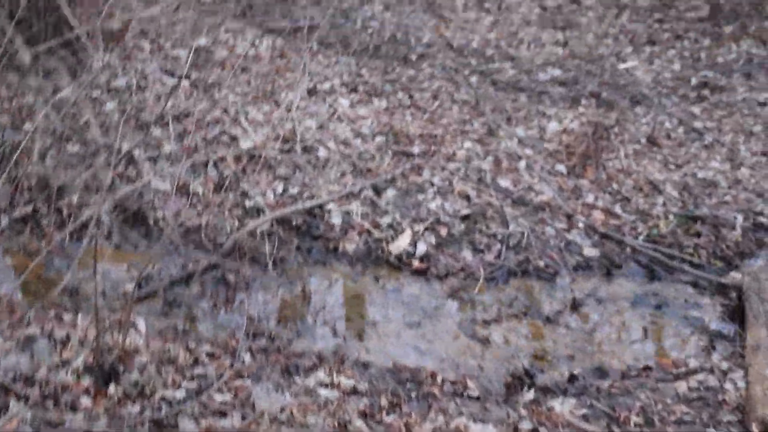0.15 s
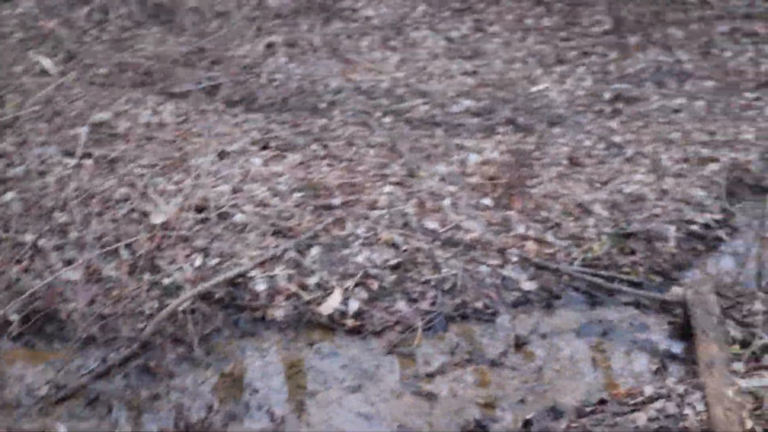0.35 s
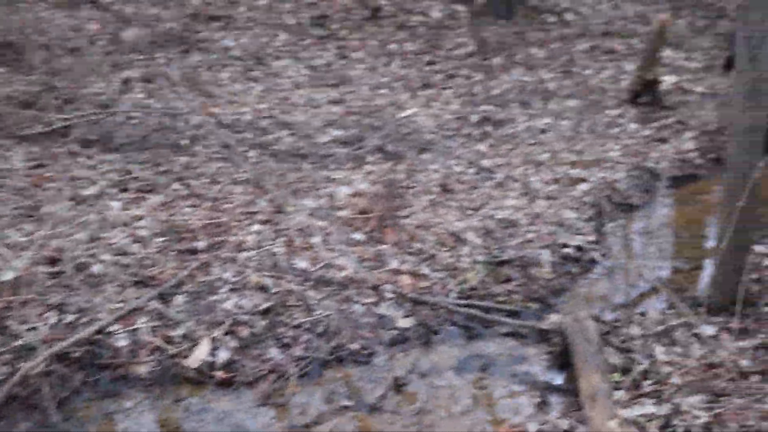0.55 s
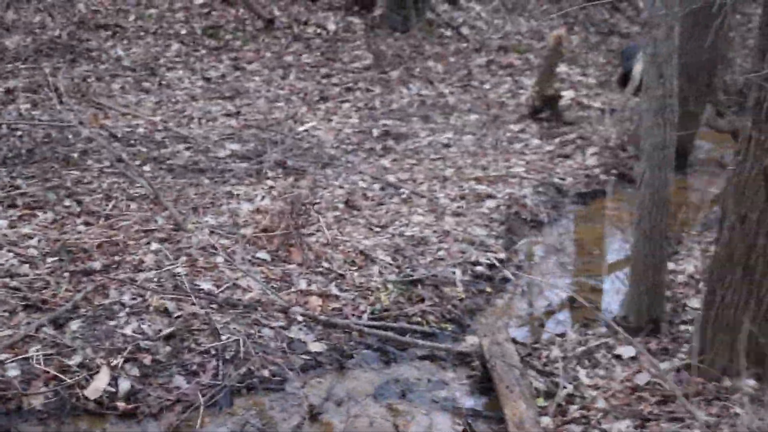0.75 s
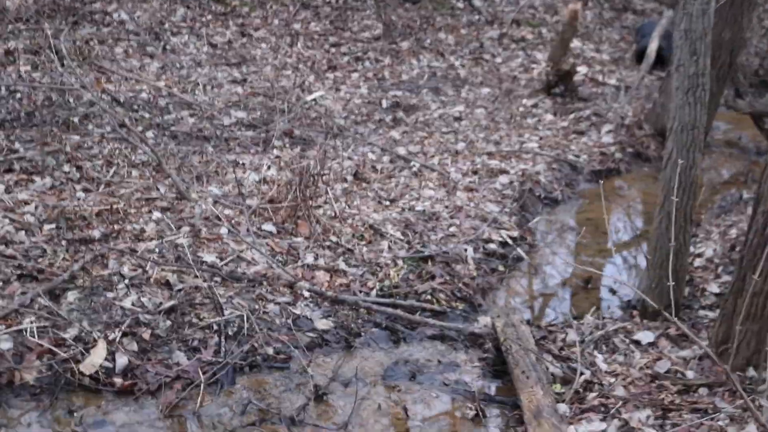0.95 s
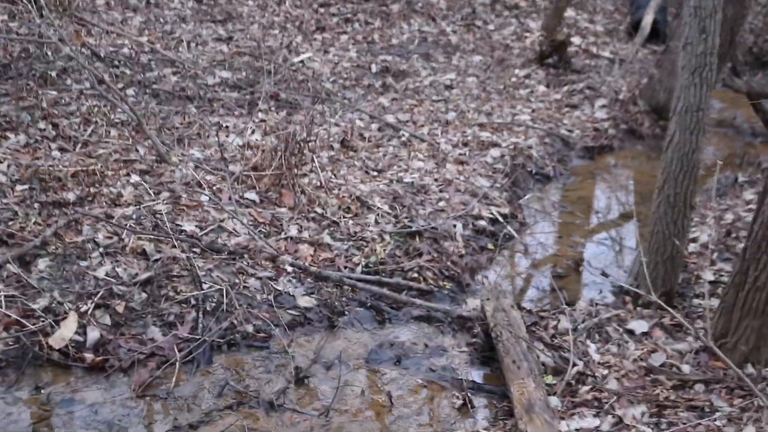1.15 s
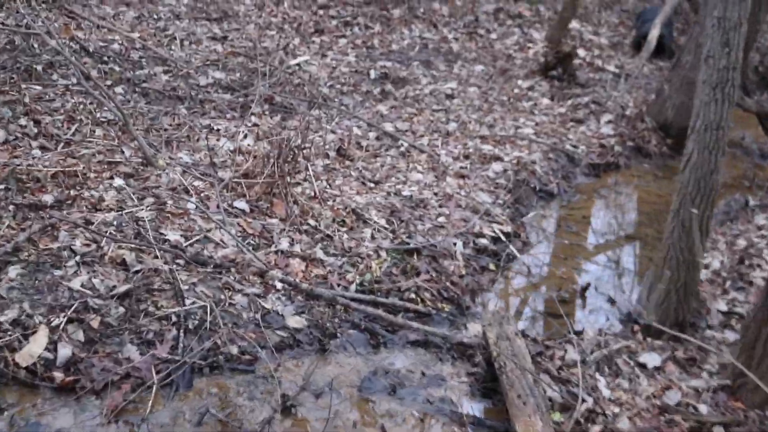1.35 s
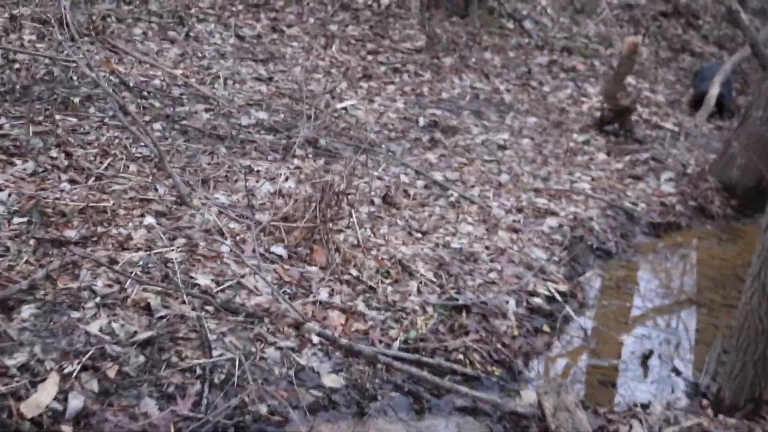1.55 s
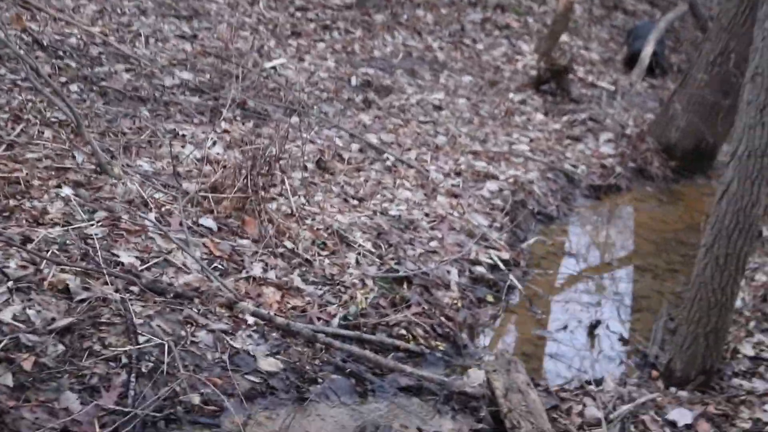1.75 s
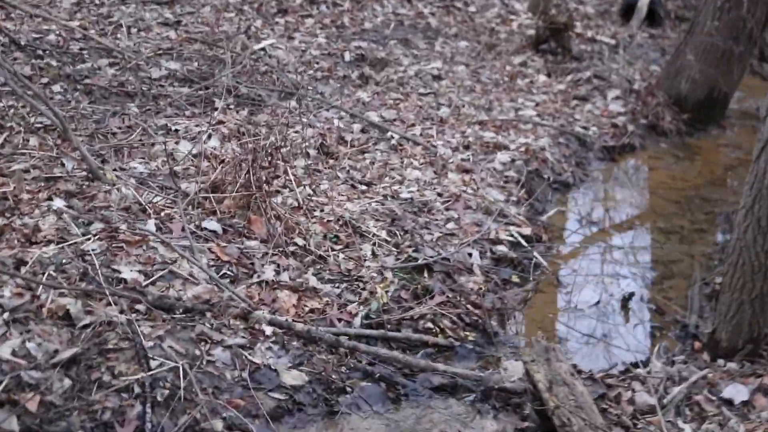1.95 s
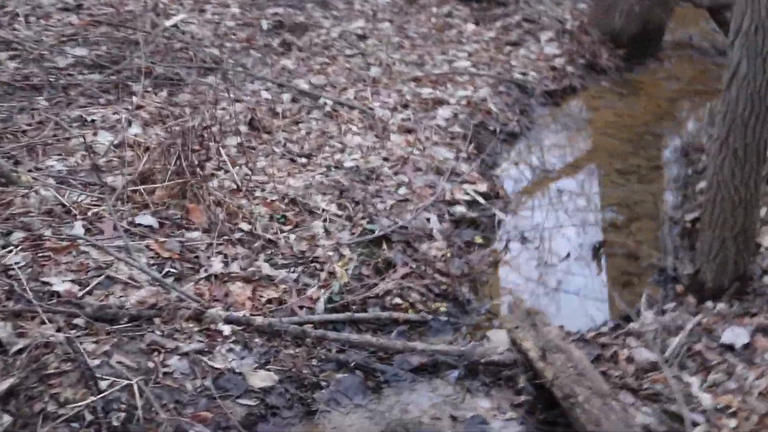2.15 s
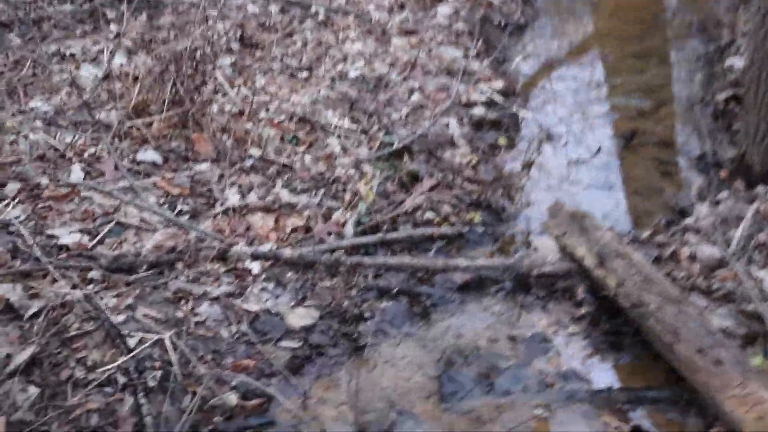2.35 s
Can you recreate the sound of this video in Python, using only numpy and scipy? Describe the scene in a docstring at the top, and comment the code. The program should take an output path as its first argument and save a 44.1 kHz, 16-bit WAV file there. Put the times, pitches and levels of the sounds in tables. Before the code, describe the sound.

Footsteps in dry leaves, close and mono, outdoors. A softer crunch swells at 0.15-0.4 s; a sharp, heavy step lands at 0.7 with a dull knock, then scattered snaps until 1.25. A bright crunch hits at 1.41 and thins out. From 2.0 a hollow dragging rub leads into uneven crunching, with brittle cracks near 2.13 and another surge at 2.25. Deep handling rumble and faint air noise underneath.

```python
"""In a wood, a walker crunches through dry leaves, carrying a small camera with one microphone.
Each step crushes and drags leaves: swarms of tiny noise bursts in three bands that follow the steps.
Twigs and leaves snap (damped rings), crack (a burst rings a bright shell) and rustle (fading high noise).
Knocks and a dragging rub sound the modes of the hollow camera body; its sway is a deep noise rumble.
Faint steady air noise lies under it all."""
import sys
import numpy as np
from scipy import signal
from scipy.io import wavfile
from scipy.ndimage import uniform_filter1d

SR = 44100
rng = np.random.default_rng(int(sys.argv[2]) if len(sys.argv) > 2 else 0)


def unload_wav(signal):
    """Save mono or channel-first audio to the path in sys.argv[1] as 16-bit WAV at rate SR, clipped to [-1, 1]."""
    wavfile.write(
        sys.argv[1],
        SR,
        np.round(np.clip(np.atleast_2d(signal).T, -1, 1) * 32767).astype(np.int16),
    )


N = 105795
T = np.arange(N) / SR

# modes of the hollow camera body, low to high: f/Hz, 60 dB decay time/s
BODY_MODES = [(114, .08), (160, .06), (228, .1), (300, .14), (580, .06), (727, .08), (1070, .03)]
# balance inside the three lowest modes and inside the three upper ones: level/dB
LOW_MODE_BALANCE = [3, -2.5, 2]
UPPER_MODE_BALANCE = [-6.5, 3.5, -7]


def gain_of(db):
    """Amplitude factor of a level in dB."""
    return 10 ** (np.asarray(db) / 20)


def evened(x):
    """Scales a sound to an rms of 1."""
    return x / np.sqrt(np.mean(x ** 2) + 1e-20)


def level(curve, column):
    """Gain over time from one dB column of a curve."""
    rows = np.array(curve)
    return gain_of(np.interp(T, rows[:, 0], rows[:, column]))


def add(mix, s, sound):
    """Mixes in a sound at s seconds, cut off at the end of the mix."""
    part = mix[round(s * SR):][:len(sound)]
    part += sound[:len(part)]


def coloured(x, points, skirt_db=-17.5):
    """Minimum-phase filter through (Hz, dB) points, falling by skirt_db per octave outside; rms 1."""
    f, db = np.transpose(points)
    octave = np.log2(np.abs(np.fft.fftfreq(8192, 1 / SR)) + 1)
    below = np.maximum(np.log2(f[0]) - octave, 0)
    above = np.maximum(octave - np.log2(f[-1]), 0)
    gain_db = np.interp(octave, np.log2(f), db) + skirt_db * (below + above)
    log_gain = np.log(gain_of(np.maximum(gain_db, -100)))
    # the Hilbert transform of the log gain supplies the phase that makes the filter causal
    taps = np.fft.ifft(np.exp(np.conj(signal.hilbert(log_gain)))).real[:4096]
    return evened(signal.oaconvolve(x, taps)[:N])


def clicks(per_s, spread_db):
    """Random clicks of either sign; a few are large."""
    chance = rng.random(N)
    size = rng.exponential(1, N)
    sign = rng.choice([-1., 1.], N)
    return sign * gain_of(spread_db * np.minimum(size, 5)) * (chance < per_s / SR)


def push(t, width_s):
    """A single soft pressure swing without a ring, peaking near 1."""
    u = t / width_s
    return u * (1 - u / 2) * np.exp(1 - u) / .63


def mode(hz, db, t60):
    """One resonance: a sine that decays by 60 dB in t60 seconds."""
    t = np.arange(6000) / SR
    return gain_of(db - 60 * t / t60) * np.sin(2 * np.pi * hz * t)


def air():
    """Faint steady air noise: coloured random pressure."""
    # colour of the air noise: f/Hz, relative density/dB per Hz
    air_spectrum = [(300, -28), (593, 18.5), (1170, 12), (3350, -22.5), (4990, -39), (13800, 12),
                    (16000, -6)]
    return gain_of(-64) * coloured(rng.standard_normal(N), air_spectrum)


def sway():
    """Deep wavering rumble of the carried camera: narrow noise, with a lumpy low noise above it."""
    # swells of the sway: t/s, deep rumble level/dB, level of the rumble above it/dB
    swells = [(0, -18, -43), (.19, -45, -48.5), (.39, -26.5, -44), (.45, -31, -49.5), (.71, -42.5, -43),
              (.8, -27, -30.5), (.94, -34., -46), (1.08, -39, -30.5), (1.11, -20.5, -42),
              (1.33, -45, -39.5), (1.59, -29.5, -36), (1.66, -38, -39), (1.78, -27, -39.5),
              (2.0, -46, -39.5), (2.17, -25.5, -34), (2.22, -33, -34), (2.28, -25, -30), (2.4, -29.5, -35)]
    # colour of the rumble above: f/Hz, relative density/dB per Hz
    rumble_spectrum = [(35, -2), (70, 1), (150, -0.5), (300, -13.5), (600, -30.5)]
    centre_hz, width_hz = 24.4, 3.6
    band = [(centre_hz - width_hz / 2, 0.), (centre_hz + width_hz / 2, 0.)]
    deep = coloured(rng.standard_normal(N), band, skirt_db=-21.5)
    above = coloured(rng.standard_normal(N), rumble_spectrum)
    return level(swells, 1) * deep + level(swells, 2) * above


def tilted(x):
    """Leans the spectrum frame by frame, as leaves of different size give way."""
    # lean of the crunch: t/s, tilt/dB per octave
    tilt_curve = [(0, -0.5), (.71, -5), (.72, -2.5), (1.4, -5.5), (1.41, 4), (1.45, -1.5), (1.98, -1),
                  (2.02, -12.5), (2.08, -12), (2.1, -0.5), (2.2, -2.5)]
    pivot_hz = 3100
    hz, t, z = signal.stft(x, SR, nperseg=256, noverlap=192)
    # the lean stops growing one octave from the pivot
    octaves = np.clip(np.log2(hz / pivot_hz + 1e-3), -1, 1)[:, None]
    gain = gain_of(octaves * np.interp(t, *np.transpose(tilt_curve)))
    return signal.istft(z * gain, SR, nperseg=256, noverlap=192)[1][:N]


def leaves():
    """Countless small leaf breaks, each a tiny decaying noise burst with its own tint."""
    # four steps, each a curve: t/s, crunch level/dB, treble level/dB, low-mid level/dB
    step_curves = [
        [(0, -49, -57.5, -48), (.058, -54, -58, -57), (.07, -36.5, -52, -43), (.11, -44, -50.5, -56.5),
         (.16, -29.5, -41, -36), (.3, -26, -37.5, -33), (.37, -34.5, -45.5, -38.5), (.445, -40.5, -50, -46),
         (.475, -35, -49, -39), (.55, -45.5, -54, -51.5), (.62, -47.5, -54, -49.5)],
        [(.68, -38.5, -50.5, -42), (.703, -19.5, -37, -23.5), (.722, -19, -35, -21.5), (.735, -23, -31, -27),
         (.765, -26, -32.5, -32), (.79, -35, -39.5, -40), (.84, -29, -40, -34.5), (.89, -37.5, -45.5, -42),
         (1.01, -37, -41.5, -39.5), (1.06, -34.5, -43, -34), (1.1, -44.5, -52.5, -47.5),
         (1.24, -41.5, -49, -46), (1.27, -46.5, -53.5, -49.5)],
        [(1.402, -45.5, -53.5, -48), (1.412, -23, -38, -31), (1.428, -17, -30, -25.5),
         (1.455, -24.5, -35, -31.5), (1.5, -21, -33.5, -28.5), (1.525, -30.5, -41, -36.5),
         (1.6, -36, -46.5, -44), (1.77, -43.5, -52, -47.5), (1.897, -36, -48, -43.5), (1.915, -47.5, -50, -49)],
        [(2.005, -43, -48.5, -44.5), (2.015, -33.5, -48.5, -25.5), (2.07, -30, -45, -55),
         (2.1, -29.5, -40.5, -38), (2.135, -19, -33, -28), (2.175, -27.5, -40.5, -31),
         (2.215, -24.5, -39, -32.5), (2.255, -19.5, -32, -27), (2.275, -30.5, -40, -34.5),
         (2.4, -40.5, -44.5, -44)],
    ]
    # colours of crunch, treble fizz and low-mid scuff: f/Hz, relative density/dB per Hz
    crunch_spectrum = [(1700, -5), (2500, 1), (3300, 3.5), (4000, -1.5), (5200, -18), (7000, -27)]
    fizz_spectrum = [(2940, -34), (5000, -3), (7640, -3), (8880, -6.5), (14000, -13), (16000, -16)]
    scuff_spectrum = [(200, -0.5), (450, 3.5), (800, 4.5), (1400, 6.5), (2200, -6.5)]
    kinds, grain_decay_s, tint_db = 24, 0.00054, 2.5
    smooth_share = 0.21  # power share of the treble that is smooth rustle

    train = clicks(per_s=5200, spread_db=2.5)
    kind = rng.integers(0, kinds, N)
    t = np.arange(200) / SR
    bursts = rng.standard_normal((kinds, 200)) * np.exp(-t / grain_decay_s)
    tint = gain_of(tint_db * rng.standard_normal((kinds, 3)))

    def grains(band):
        """The swarm of breaks, tinted for one band."""
        out = np.zeros(N)
        for k in range(kinds):
            out += tint[k, band] * signal.oaconvolve(train * (kind == k), evened(bursts[k]))[:N]
        return out

    crunch = tilted(coloured(grains(0), crunch_spectrum))
    rustle = rng.standard_normal(N)
    treble = np.sqrt(1 - smooth_share) * evened(grains(1)) + np.sqrt(smooth_share) * rustle
    fizz = coloured(treble, fizz_spectrum)
    scuff = coloured(grains(2), scuff_spectrum)
    steps = np.concatenate(step_curves)
    return level(steps, 1) * crunch + level(steps, 2) * fizz + level(steps, 3) * scuff


def knocks():
    """A short push sets the body's modes swelling up, neighbours in opposite phase."""
    # knocks on the body: t/s, dull push level/dB, then levels of the three lowest modes/dB,
    # the fourth mode/dB and the upper modes/dB
    hits = [(.002, -51, -47, -29.5, -61), (.07, -33, -55, -37, -58), (0.352, -17.5, -60, -47, -56),
            (0.4, -54, -33, -33, -54), (0.713, -3, -45, -48, -42), (0.758, -18, -22.5, -28.5, -35),
            (.81, -43, -53, -30.5, -53), (0.898, -37, -30, -55, -52), (.92, -44, -29.5, -50, -58),
            (0.971, -47, -30, -54, -55), (1.06, -26, -22, -27.5, -39), (1.079, -22, -23, -40, -56),
            (1.197, -23, -51, -55, -57), (1.224, -20.5, -53, -61, -45), (1.629, -14, -41, -69, -40),
            (1.885, -45, -34, -35.5, -51), (1.924, -20.5, -28.5, -24.5, -32), (2.322, -49, -49, -30, -38.5),
            (2.35, -36, -50, -31, -32.5)]
    push_s, swell_s = 0.00024, 0.0017
    out = np.zeros(N)
    t = np.arange(6000) / SR
    dull_push = np.convolve(push(t, push_s), np.hanning(24) / 12)[:6000]
    swell = 1 - np.exp(-t / swell_s)
    for s, push_db, low_db, fourth_db, upper_db in hits:
        low_dbs = np.add(low_db, LOW_MODE_BALANCE)
        upper_dbs = np.add(upper_db, UPPER_MODE_BALANCE)
        ring = np.zeros(6000)
        for k, ((hz, t60), db) in enumerate(zip(BODY_MODES, [*low_dbs, fourth_db, *upper_dbs])):
            ring += (-1) ** k * mode(hz, db, t60)
        add(out, s, gain_of(push_db) * dull_push + ring * swell)
    return out


def cracks():
    """A brief splintering burst breaks sharply and rings a stiff, bright shell."""
    # bright brittle cracks: t/s, peak level/dB, sharp break against the ring/dB
    breaks = [(0.0683, -21, 30), (1.804, -32.5, 13), (2.1324, -4, -7), (2.1505, -9.5, 5), (2.319, -23, 6)]
    # modes of the shell: f/Hz, relative level/dB, 60 dB decay time/s
    shell_modes = [(4080, 10, 0.011), (7030, 6.5, 0.0084), (8160, 9.5, 0.0046), (10400, -11, 0.0038),
                   (15100, -25, 0.0054)]
    burst_decay_s = 0.0019
    out = np.zeros(N)
    t = np.arange(400) / SR
    shell = sum(mode(*m) for m in shell_modes)[:1500]
    for s, db, break_db in breaks:
        burst = rng.standard_normal(400) * np.exp(-t / burst_decay_s)
        crack = signal.fftconvolve(burst, shell)
        crack[:399] += gain_of(break_db) * np.diff(burst)  # differencing sharpens the break
        add(out, s, gain_of(db) * crack / abs(crack).max())
    return out


def snaps():
    """Leaves and twigs snap: a quickly damped ring, a low pop and a short crumbling tail."""
    # snaps: t/s, ring peak level before the low-pass/dB, pitch f/Hz, decay/cycles
    snap_list = [(0.0695, -21, 2340, 1.4), (0.1164, -21, 3600, 1.6), (0.1672, -14.5, 3530, 1.5),
                 (0.1836, -14, 2850, 1.9), (0.2133, -17, 2620, 4.5), (0.2739, -2, 2450, 0.32),
                 (0.3526, -21, 3500, 1.4), (0.383, -18, 2680, 2.1), (0.677, -23, 3000, 1),
                 (0.7205, -2.5, 3420, 5.3), (0.8066, -18, 2430, 1.5), (0.8311, -11, 3100, 0.46),
                 (0.8433, -14, 3070, 2.2), (0.8744, -23.5, 1240, 1.1), (0.9378, -14.5, 2660, 0.75),
                 (0.9903, -8.5, 3560, 1.9), (1.004, -14.5, 3530, 2.1), (1.0127, -7, 3550, 1.5),
                 (1.0566, -16.5, 3370, 2.5), (1.1228, -28, 2400, 1.5), (1.1398, -22, 2750, 2.2),
                 (1.2237, -22, 2250, 1.1), (1.5421, -12.5, 3230, 2.5), (1.5756, -24, 2240, 1.5),
                 (1.6284, -18, 2800, 1.1), (1.718, -25, 3320, 2.6), (1.923, -26.5, 1230, 0.82),
                 (2.1381, -14, 1746, 7.6), (2.188, -14.5, 2560, 2.3), (2.2055, -10.5, 3360, 2),
                 (2.2459, -6.5, 3680, 0.87)]
    rise_s, pop_s, tail_s = 0.00031, 0.0001, 0.0063
    pop_db, tail_db, overtone_db = -11.5, -14, -14  # against the ring, its peak, and its fundamental
    overtone_ratio, top_hz = 1.7, 7160
    out = np.zeros(N)
    t = np.arange(1200) / SR
    rise = (1 - np.exp(-t / rise_s)) ** 2
    pop = gain_of(pop_db) * push(t, pop_s)
    for s, db, hz, cycles in snap_list:
        overtone = gain_of(overtone_db) * np.sin(2 * np.pi * overtone_ratio * hz * t)
        decay = np.exp(-t * hz / max(cycles, .3))
        ring = (np.sin(2 * np.pi * hz * t) + overtone) * decay * rise
        band = signal.butter(2, [hz * 0.43, hz * 0.94], "band", fs=SR)
        crumbs = evened(signal.lfilter(*band, rng.standard_normal(1200)))
        tail = gain_of(tail_db) * crumbs * np.exp(-t / tail_s) * rise
        add(out, s - rise_s, gain_of(db) * (ring / abs(ring).max() + tail + pop))
    return signal.lfilter(*signal.butter(4, top_hz, fs=SR), out)


def rustles():
    """Small high rustles of single leaves: a quick start, then fading noise in a narrow band."""
    # rustles: t/s, length/s, pitch f/Hz, rms level before the fade/dB
    rustle_list = [(1.145, 0.016, 8200, -50), (1.407, 0.044, 4360, -31), (1.864, 0.043, 5200, -51),
                   (2.013, 0.045, 7300, -41)]
    out = np.zeros(N)
    for s, length, hz, db in rustle_list:
        t = np.arange(0, length, 1 / SR)[:3000]
        band = signal.butter(2, [hz * 0.87, hz * 1.08], "band", fs=SR)
        noise = signal.lfilter(*band, rng.standard_normal(3000))[:len(t)]
        fade = np.cos(np.pi / 2 * t / length)
        add(out, s, gain_of(db) * evened(noise) * fade)
    return out


def rub():
    """Something drags over the body in uneven slips that keep its modes sounding, the lowest peaking last."""
    # the drag: t/s, then rms level/dB of each mode group in turn
    drag = [(2.0, -61, -56, -62, -53), (2.016, -29, -39, -38, -46), (2.05, -20.5, -32, -33.5, -54),
            (2.07, -23, -16.5, -23, -57), (2.088, -20.5, -21, -22, -37), (2.11, -29, -64, -28, -45),
            (2.135, -33, -46, -24, -18), (2.17, -35, -57, -27, -27.5), (2.22, -50, -55., -43, -51)]
    # mode groups, highest first: each row holds row numbers of BODY_MODES
    mode_groups = [
        [5, 6],
        [4],
        [2, 3],
        [0],
    ]
    steady_s = 0.029
    inside = (T > drag[0][0]) & (T < drag[-1][0])
    balance_db = [*LOW_MODE_BALANCE, -5., *UPPER_MODE_BALANCE]
    slips = clicks(per_s=1200, spread_db=0.57)
    out = np.zeros(N)
    for column, group in enumerate(mode_groups, start=1):
        body = sum(mode(BODY_MODES[k][0], balance_db[k], BODY_MODES[k][1]) for k in group)
        ring = signal.oaconvolve(slips, body)[:N]
        # dividing by the running rms leaves the level to the drag curve
        power = abs(uniform_filter1d(ring ** 2, round(steady_s * SR)))
        out += inside * level(drag, column) * ring / np.sqrt(power + 1e-9)
    return out


def scene():
    """Sums all layers and puts the one microphone on both channels."""
    ground = leaves() + snaps() + cracks() + rustles()
    camera = knocks() + rub() + sway()
    return np.tile(ground + camera + air(), (2, 1))


def record(dry):
    """The input rounds off the highest peaks towards full scale; then a low-pass limits the band."""
    edge_hz = 15900
    rounded = dry / (1 + abs(dry) ** 4) ** .25
    low_pass = signal.firwin(511, edge_hz, window=("kaiser", 9), fs=SR)
    return signal.oaconvolve(rounded, low_pass[None], "same")


dry = scene()
out = record(dry)
unload_wav(out)
```